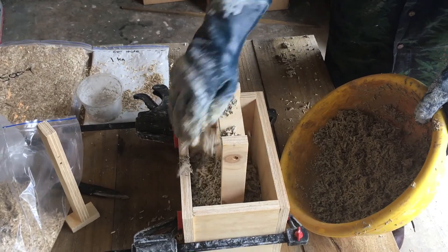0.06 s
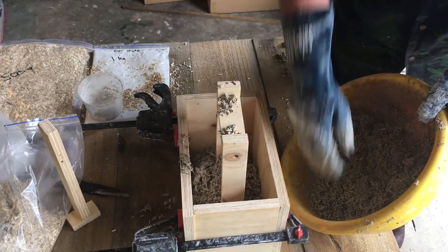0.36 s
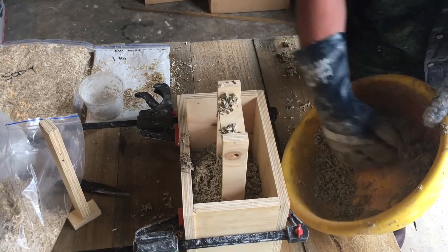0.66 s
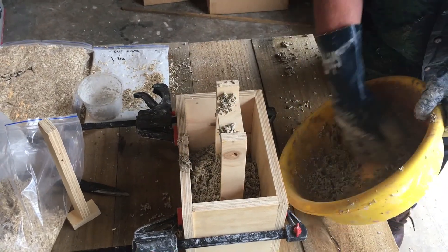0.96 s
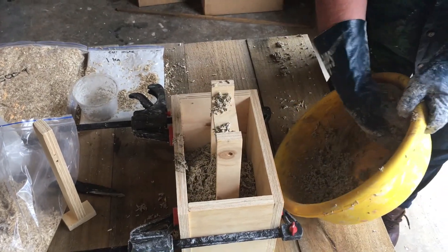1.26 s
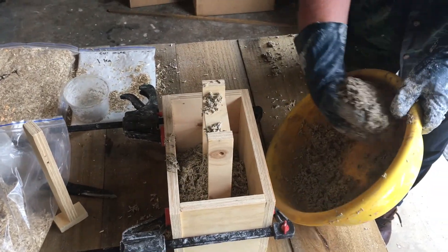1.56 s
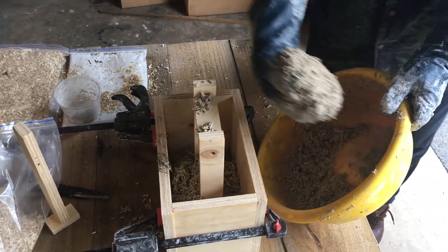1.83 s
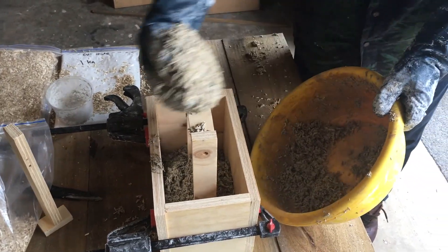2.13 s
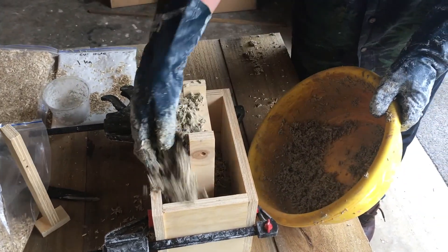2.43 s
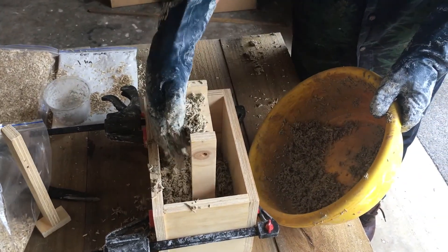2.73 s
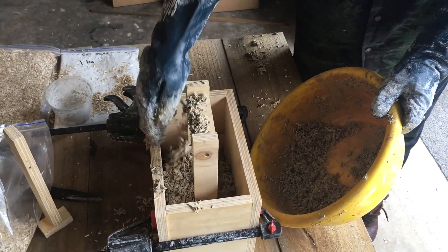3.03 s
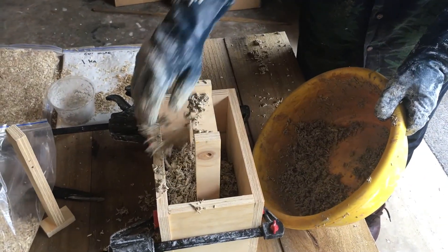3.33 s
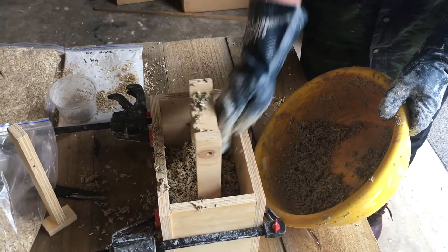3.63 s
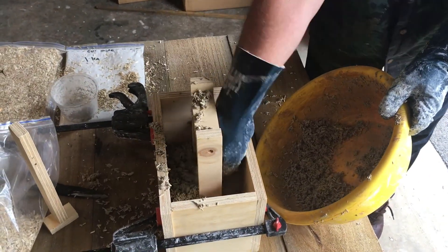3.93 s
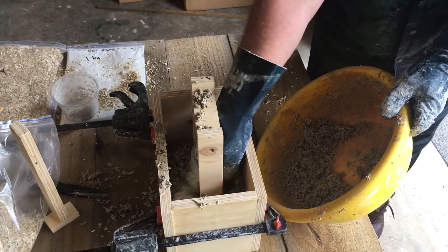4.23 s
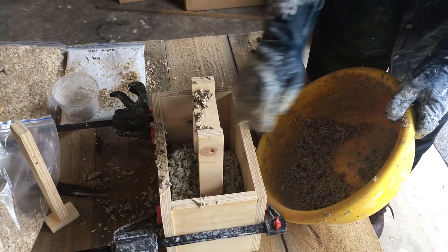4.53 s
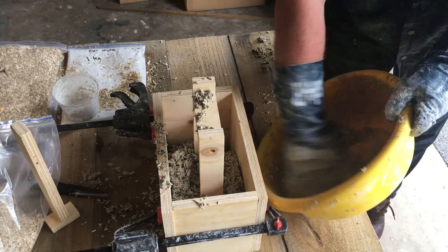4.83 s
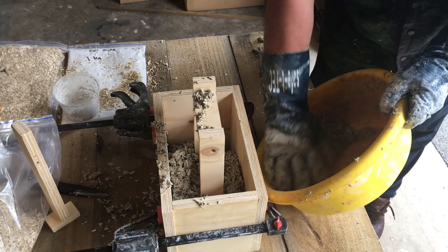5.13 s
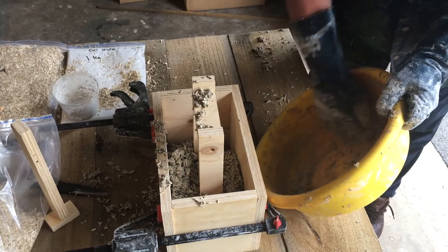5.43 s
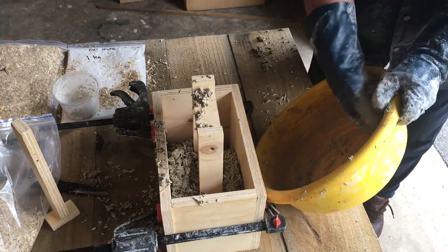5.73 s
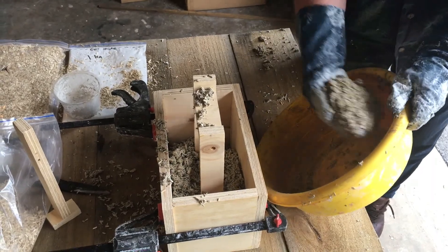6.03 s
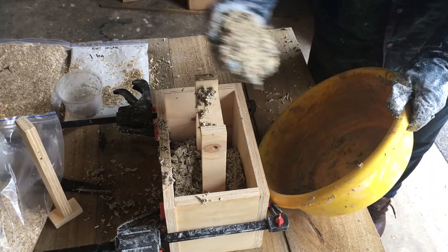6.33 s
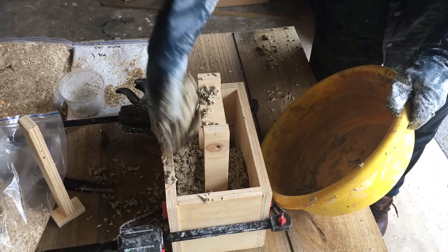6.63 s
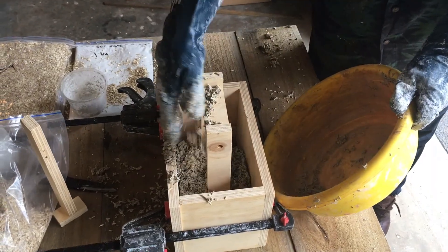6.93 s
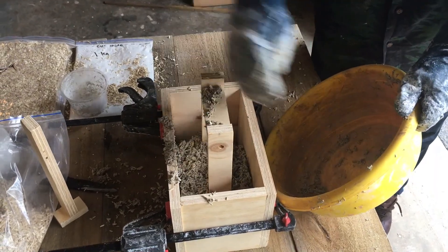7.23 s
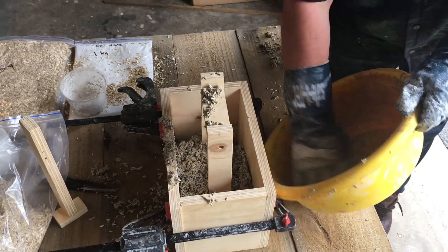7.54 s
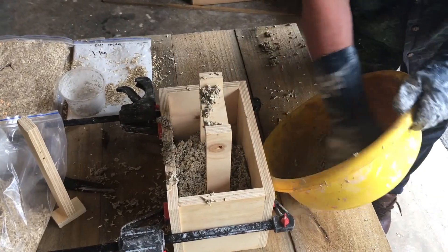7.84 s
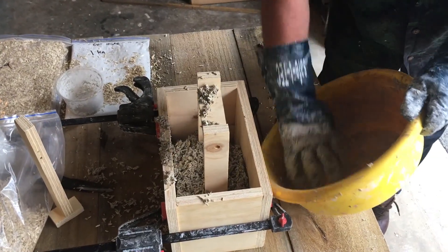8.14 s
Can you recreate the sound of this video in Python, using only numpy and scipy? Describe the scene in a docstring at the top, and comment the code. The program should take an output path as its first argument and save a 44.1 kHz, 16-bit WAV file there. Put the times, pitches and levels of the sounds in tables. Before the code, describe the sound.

Close to the microphone in a workshop, damp grit rasps against a plastic bowl in three bouts of scooping, with light slaps of a gloved hand on its wall. After the first, crumbs patter and the mix is packed into a wooden form with knocks and sticky rubber pops. After the second come quieter pressing and one tiny squeak. Distant traffic and a slowing engine rumble faintly underneath.

```python
"""Packing a damp mix by hand

Rubber-gloved hands scrape a damp, gritty mix together in a plastic bowl, drop it into a wooden form
and press it down. Friction is a train of tiny slips that excites the modes of bowl, glove and boards.
Crumbs tick on the bench; the wet glove pops and squeaks once. Outside the workshop traffic rumbles
and an engine slows down. One close microphone."""
import sys
import numpy as np
from scipy import signal
from scipy.fft import rfft, irfft, next_fast_len
from scipy.io import wavfile
from scipy.ndimage import uniform_filter1d, map_coordinates

SR = 44100
rng = np.random.default_rng(int(sys.argv[2]) if len(sys.argv) > 2 else 0)


def wav_out(sig):
    """Save sig, one row per channel (or a flat mono array), as 16-bit PCM at SR to the path in sys.argv[1]."""
    wavfile.write(sys.argv[1], SR, np.round(np.clip(np.atleast_2d(sig).T, -1, 1) * 32767).astype(np.int16))


N = 369558


def amp(db):
    """Decibels to amplitude ratio."""
    return 10 ** (np.asarray(db) / 20)


def unit(x):
    """Normalisation to rms 1."""
    return x / np.sqrt(np.mean(x ** 2) + 1e-20)


def along(points, hz):
    """Interpolation of (f/Hz, value) points on a logarithmic frequency axis."""
    f, values = np.transpose(points)
    return np.interp(np.log(hz + 1), np.log(f + 1), values)


def curves(rows):
    """Linear interpolation of (t/s, values...) rows: one curve per column, one value per sample."""
    times, *columns = np.transpose(rows)
    return [np.interp(np.arange(N) / SR, times, column) for column in columns]


def during(rows):
    """Rectangular window from the first row's time to the last."""
    t = np.arange(N) / SR
    return (t >= rows[0][0]) & (t <= rows[-1][0])


def wobble(rate):
    """Smooth random modulation: a spline through `rate` knots a second."""
    knots = rng.standard_normal(int(N * rate / SR) + 4)
    return map_coordinates(knots, [np.arange(N) * rate / SR])


def add(track, start, sound):
    """Superposition of a sound on the track from `start` seconds."""
    part = track[max(round(start * SR), 0):][:len(sound)]
    part += sound[:len(part)]


def filtered(x, response):
    """Linear filtering: the spectrum times a complex frequency response."""
    size = next_fast_len(len(x) + SR // 4)
    return irfft(rfft(x, size) * response(np.fft.rfftfreq(size, 1 / SR)), size)[:len(x)]


def coloured(x, spectrum):
    """Spectral shaping by (f/Hz, level/dB) points; rms 1."""
    return unit(filtered(x, lambda hz: amp(along(spectrum, hz))))


def resonate(x, modes):
    """Forced response of (f/Hz, bandwidth/Hz, level/dB) modes of alternating polarity."""
    return filtered(x, lambda f: sum(
        (-1) ** k * amp(db) * 1j * f * width / (hz * hz - f * f + 1j * f * width)
        for k, (hz, width, db) in enumerate(modes)))


def gliding(x, centre_hz, width_hz):
    """Time-varying resonance: shift down by the centre frequency, low-pass, shift back; rms 1."""
    carrier = np.exp(2j * np.pi * np.cumsum(centre_hz) / SR)
    pole = np.exp(-np.pi * width_hz / SR)
    baseband = signal.lfilter([1], np.poly([pole, pole]), x / carrier)
    return unit((baseband * carrier).real)


def ring(modes, attack_s=0.00072):
    """Free vibration: each mode decays at a rate proportional to its bandwidth; peak 1."""
    t = np.arange(SR // 4) / SR
    tone = sum(amp(db) * np.exp(-np.pi * width * t)
               * np.sin(2 * np.pi * hz * t + rng.uniform(0, 2 * np.pi)) for hz, width, db in modes)
    tone *= 1 - np.exp(-t / attack_s)
    return tone / np.abs(tone).max()


def impact(modes, contact_s):
    """Rough contact: a noise force, falling 60 dB in contact_s, drives the modes; peak 1."""
    t = np.arange(SR // 6) / SR
    force = rng.standard_normal(len(t)) * amp(-60 * t / contact_s)
    response = resonate(force, modes)
    return response / np.abs(response).max()


def grains(rate, spread_db):
    """Shot noise: on average `rate` slips a second, of log-normal size; rms 1."""
    impulses = (rng.random(N) < rate / SR) * rng.choice([-1, 1], N)
    return unit(impulses * amp(spread_db * rng.standard_normal(N)))


def patchy(x, depth_db):
    """Spectral fluctuation: clumps of different size colour the sound from moment to moment; rms 1."""
    spectra = signal.stft(x, nperseg=512)[2]
    patches = uniform_filter1d(rng.standard_normal(spectra.shape), size=5, axis=0)
    patches = uniform_filter1d(patches, size=7, axis=1)
    return unit(signal.istft(spectra * amp(depth_db * unit(patches)), nperseg=512)[1][:N])


def clock(step_s=0.001):
    """Coarse time axis for the hand's movements."""
    return np.arange(0, N / SR, step_s)


def effort(start, build, hold, release, contact_s=0.012, first_touch_db=-9):
    """Force envelope in dB: touch, lean in, hold, then fall 20 dB per release time."""
    t = clock() - start
    touch_db = 20 * np.log10(np.clip(t / contact_s, 1e-6, 1))
    lean_db = first_touch_db * np.clip(1 - t / build, 0, 1)
    after = np.maximum(t - build - hold, 0)
    settle_db = -11.5 - 75 * after  # loose grit slides on after the hand stops
    return touch_db + lean_db + np.maximum(-20 * after / release, settle_db)


def overlap(movements):
    """Incoherent addition of (level/dB, traits...) movements: powers sum and weight the traits."""
    level_db, *traits = np.swapaxes(movements, 0, 1)
    power = amp(level_db) ** 2 + 1e-14
    blended = [np.average(trait, axis=0, weights=power) for trait in traits]
    return curves(np.transpose([clock(), 10 * np.log10(power.sum(axis=0)), *blended]))


# Spectra of the street's rumble and tyre noise: f/Hz, level/dB
RUMBLE_SPECTRUM = [(20, -53), (31, -9), (44, 2.5), (60, 0), (97, 2), (125, -6.5), (150, -1), (180, -11),
                   (205, -5.5), (250, -18.5), (450, -56), (900, -84)]
TYRE_SPECTRUM = [(120, -10.5), (280, -0.5), (360, 0.5), (480, -7), (850, -5), (1330, -8), (2500, -19),
                 (6000, -28.5), (10500, -42.5), (15800, -39)]
# Swell of the traffic: t/s, relative rumble level/dB, relative tyre level/dB
TRAFFIC_LEVELS = [(0, -61.5, -65), (3.2, -62, -65.5), (4.7, -57.5, -65), (5.8, -55.5, -60.5),
                  (6.4, -55.5, -59), (7.3, -55, -62)]

def traffic():
    """Broadband noise of distant traffic: a low rumble under wavering tyre noise."""
    rumble_db, tyre_db = curves(TRAFFIC_LEVELS)
    rumble = amp(rumble_db + 0.26) * coloured(rng.standard_normal(N), RUMBLE_SPECTRUM)
    tyres = amp(tyre_db - 0.9 + 0.5 * wobble(4.4)) * coloured(rng.standard_normal(N), TYRE_SPECTRUM)
    return rumble + tyres


# An engine slowing: t/s, cycle rate/Hz, level/dB
ENGINE_RUN = [(0, 36.2, -59), (1.45, 29.7, -56.5), (2.7, 24.4, -58), (3.6, 21.8, -60), (4.3, 20.5, -72)]
# Low modes of the workshop: f/Hz, bandwidth/Hz, level/dB
ROOM_MODES = [(60, 22, -1), (97, 28, 0), (152, 36, -.5)]

def engine():
    """Harmonics of the falling cycle rate swell as each slides through a room mode."""
    cycle_hz, level_db = curves(ENGINE_RUN)
    phase = 2 * np.pi * np.cumsum(cycle_hz) / SR
    orders = sum(amp(2 * wobble(3)) * np.sin(k * phase + rng.uniform(0, 2 * np.pi)) for k in range(2, 7))
    return during(ENGINE_RUN) * amp(level_db) * unit(resonate(orders, ROOM_MODES))


# Reverberation time of the workshop: f/Hz, T60/s
ROOM_DECAY = [(200, 0.42), (2000, 0.17), (12000, 0.14)]

def room(x):
    """Reverberation: convolution with a short, exponentially decaying tail whose treble dies first."""
    hz, t, spectra = signal.stft(rng.standard_normal(SR // 2), SR, nperseg=256)
    decay = amp(-60 * t / along(ROOM_DECAY, hz)[:, None])
    tail = signal.istft(spectra * decay, SR, nperseg=256)[1]
    delayed = np.pad(x, (150, 0))
    return signal.fftconvolve(delayed, tail / np.linalg.norm(tail))[:N]


# Modes of the glove: f/Hz, bandwidth/Hz, level/dB
GLOVE_MODES = [(1420, 48, 0), (3290, 110, -1.5)]
# The glove coming unstuck: t/s, note level/dB, scuff level/dB
GLOVE_POPS = [(3.3192, -48, -48), (3.3342, -45, -39.5), (3.3755, -51, -50), (3.7378, -52, -40),
              (3.794, -45, -48), (4.548, -45, -38), (6.6944, -62, -44), (6.924, -46, -45)]

def glove_pops():
    """Sudden release of adhesion: wet rubber lets go with a hollow note and a short scuff."""
    track = np.zeros(N)
    hollow_mode, (upper_hz, width, _) = GLOVE_MODES
    for start, note_db, scuff_db in GLOVE_POPS:
        hz = upper_hz * (1 + 0.02 * rng.standard_normal())
        add(track, start, amp(note_db) * ring([hollow_mode]))
        add(track, start, amp(scuff_db) * impact([(hz, width, 0), (2300, 2600, -12)], contact_s=0.03))
    return track


# Rubber slipping: t/s, f/Hz, relative level/dB
SQUEAK_GLIDE = [(6.702, 3400, -74), (6.708, 3750, -55), (6.72, 4550, -58), (6.735, 3550, -58),
                (6.75, 3500, -56.5), (6.765, 3460, -59), (6.82, 3290, -59), (6.85, 2880, -64)]

def glove_squeak():
    """Stick-slip oscillation of rubber: one gliding tone, unsteady in pitch and level."""
    hz, level_db = curves(SQUEAK_GLIDE)
    phase = 2 * np.pi * np.cumsum(hz * (1 + 0.05 * wobble(900))) / SR
    return during(SQUEAK_GLIDE) * amp(level_db - 1.5 + 3.5 * wobble(200)) * np.sin(phase)


# Fine crumbs spilling off the glove: t/s, hold/s, level/dB
FINE_SPILLS = [(0.136, 0.38, -72.5), (1.58, 0.18, -73), (2.404, 0.26, -71), (6.7, 0.5, -71.5)]

def trickle(stray_db=-78):
    """Shot noise of fine crumbs: a faint, constant patter that swells with each spill."""
    spill_db, = overlap([[db + effort(start, build=0.083, hold=hold, release=0.11)]
                         for start, hold, db in FINE_SPILLS])
    fines = grains(rate=1200, spread_db=3) * amp(3 * wobble(45))
    patter = unit(resonate(fines, [(2560, 2500, 0)])) + amp(-4) * unit(resonate(fines, GLOVE_MODES))
    return np.hypot(amp(spill_db), amp(stray_db)) * unit(patter)


# One rub of the glove (first row), then crumbs ticking: t/s, relative level/dB, f/Hz, contact time/s
RUB_AND_TICKS = [(0.044, -35.5, 7640, .1), (0.179, -49, 2800, .04), (0.3, -46, 2700, 0.059),
                 (0.363, -46.5, 2010, 0.05), (0.4953, -46.5, 2580, .03), (1.6295, -48.5, 2283, 0.13),
                 (1.701, -48, 2420, 0.032), (1.772, -50.5, 2300, 0.11), (2.018, -52, 3500, 0.038),
                 (2.524, -41.5, 2760, 0.05), (2.609, -37, 4500, 0.018), (2.635, -41.5, 2500, .02),
                 (3.496, -43.5, 3400, 0.018), (4.523, -37.5, 2240, 0.022), (5.242, -41, 9000, 0.025),
                 (6.31, -45, 2200, 0.03), (7.141, -41, 1980, 0.034)]

def rub_and_ticks():
    """Heavily damped contacts (Q = 1): a brief, bright rub of the glove, then dead ticks of crumbs."""
    track = np.zeros(N)
    for start, db, hz, contact_s in RUB_AND_TICKS:
        add(track, start, amp(db) * impact([(hz, hz, 0)], contact_s))
    # the damp mix softens the treble
    return filtered(track, lambda hz: amp(along([(5500, 1), (11000, -12.5)], hz)))


# A handful breaking up in the form: t/s, build-up/s, hold/s, f/Hz, level/dB
BREAKUPS = [(2.46, 0.07, 0.1, 2800, -62.5), (2.8, 0.17, 0.11, 3230, -59.5)]

def crumbling():
    """Fracture noise: clusters of tiny cracks in one narrow, wandering band."""
    track = np.zeros(N)
    for start, build, hold, hz, db in BREAKUPS:
        level_db, = overlap([[db + effort(start, build, hold, release=0.1)]])
        cracks = grains(rate=700, spread_db=4) * amp(3 * wobble(50))
        track += amp(level_db) * gliding(cracks, hz * (1 + 0.025 * wobble(25)), width_hz=420)
    return track


# Modes of the wooden form: f/Hz, bandwidth/Hz, level/dB
FORM_MODES = [(140, 24, -2), (200, 16, 0), (300, 46, 0), (372, 50, -1), (872, 100, -6)]
# Fingers bumping the form: t/s, click level/dB, boom level/dB, f of the struck spot/Hz
FORM_KNOCKS = [(0.071, -42, -57, 600), (3.383, -45, -46, 347), (3.734, -53, -49, 200),
               (3.789, -38, -40.5, 195), (3.855, -33.5, -36, 293), (3.867, -55, -44, 140),
               (4.267, -36, -59, 800)]

def form_knocks(db_per_octave=20):
    """Modal excitation: a knock favours the modes nearest the pitch of the struck spot."""
    track = np.zeros(N)
    for start, click_db, boom_db, spot_hz in FORM_KNOCKS:
        modes = [(hz, width, db - db_per_octave * abs(np.log2(hz / spot_hz)))
                 for hz, width, db in FORM_MODES]
        add(track, start, amp(click_db) * impact([(880, 290, 0)], contact_s=0.011))
        add(track, start, amp(boom_db) * ring(modes))
    return track


# The hand striking the bowl: t/s, slap level/dB, thump level/dB
BOWL_SLAPS = [(0.532, -35.5, -65), (4.83, -36, -58), (4.855, -56, -47.5), (5.195, -41, -66),
              (7.928, -32.5, -50), (8.344, -56.5, -40), (8.363, -37, -41)]
# A falling lump tapping the bowl: t/s, level/dB, f/Hz
LUMP_TAP = (6.213, -46.5, 1320)

def bowl_strikes():
    """Impulse response of the bowl: the hand gives a slap and a low thump, a lump rings one mode."""
    track = np.zeros(N)
    for start, slap_db, thump_db in BOWL_SLAPS:
        add(track, start, amp(slap_db) * impact([(1156, 100, 10), (6000, 8300, -12.5)], contact_s=0.012))
        add(track, start, amp(thump_db) * ring([(145, 26, 0)]))
    start, db, hz = LUMP_TAP
    add(track, start, amp(db) * ring([(hz, 55, 0)]))
    return track


# Spectrum of rubber on the mix: f/Hz, level/dB
RUB_SPECTRUM = [(250, -5), (500, -4), (850, -4.5), (1300, -5.5), (2180, -1.5), (2700, -11), (3250, -4),
                (5500, -10), (8860, -18), (10400, -22.5), (15800, -29)]
# Pressing into the form: t/s, build-up/s, hold/s, relative rub level/dB, relative push level/dB
HAND_PRESSES = [(-0.01, 0.042, 0.011, -53.5, -75), (2.388, 0.033, 0.23, -61, -70),
                (2.716, 0.11, .02, -63, -85), (2.909, 0.04, .12, -57, -61),
                (3.288, 0.05, 0.017, -55.5, -66), (3.576, 0.004, 0.022, -53, -78),
                (3.713, 0.02, 0.062, -48.5, -56.5), (3.841, 0.035, 0.042, -50.5, -51),
                (4.014, 0.018, 0.02, -51.5, -56), (4.16, 0.065, 0.076, -56.5, -62),
                (4.376, 0.05, 0.05, -50, -50), (4.537, 0.006, 0.008, -45.5, -63),
                (6.678, 0.061, 0.12, -63.5, -73), (6.948, 0.048, 0.097, -67, -80)]

def packing():
    """Friction-driven vibration: the glove rubs the mix and drags on the boards, whose modes groan."""
    rub_db, = overlap([[db + effort(start, build, hold, release=0.1)]
                       for start, build, hold, db, _ in HAND_PRESSES])
    push_db, = overlap([[db + effort(start, build, hold, release=0.12)]
                        for start, build, hold, _, db in HAND_PRESSES])
    slips = grains(rate=4000, spread_db=1.5) * amp(1.73 * wobble(110))
    glove_tone = amp(-8) * unit(resonate(slips, GLOVE_MODES))
    rub = patchy(coloured(slips, RUB_SPECTRUM) + glove_tone, depth_db=2.5)
    drag = resonate(grains(rate=900, spread_db=2), [(335, 150, 0), (872, 200, -6)])
    boards = unit(resonate(drag, FORM_MODES))
    return amp(rub_db + 1.37) * rub + amp(push_db - 1.5) * boards


# Main resonance of the bowl's wall: t/s, f/Hz
WALL_PITCH = [(0.7, 1170), (1.05, 1290), (1.17, 1130), (5.0, 1170), (7.6, 1100)]
# Modes of the wall: ratio to that resonance, bandwidth/Hz, level/dB
WALL_MODES = [(1, 190, -15), (1.85, 450, -16.5)]

def bowl_wall(slips, wander=0.05, swell_db=3):
    """Forced vibration of the plastic wall under the grit; its modes shift as hand and load move."""
    wall_hz, = curves(WALL_PITCH)
    return sum(amp(db + swell_db * wobble(14))
               * gliding(slips, ratio * wall_hz * (1 + wander * wobble(12)), width)
               for ratio, width, db in WALL_MODES)


def stroke(start, build, hold, release, db, heap_db, bright_db):
    """Level, heap and brightness envelopes in dB: the heap thins with travel, and force adds treble."""
    effort_db = effort(start, build, hold, release)
    thinning_db = 25.5 * np.clip(clock() - start, 0, build + hold)
    lift_db = 0.72 * np.maximum(effort_db, -30)
    return db + effort_db, heap_db - thinning_db, bright_db + lift_db


# Spectrum of grit on plastic: f/Hz, level/dB
GRIT_SPECTRUM = [(100, -14), (190, -4.5), (270, -15.5), (390, -6), (560, -13), (850, -5), (1150, -1),
                 (2400, -0.5), (2850, -4), (3300, 1.3), (4600, 1), (5900, -1), (9500, -8.5), (10400, -11),
                 (15800, -15.5)]
# Strokes through the bowl: t/s, build-up/s, hold/s, release/s, relative level/dB, heap/dB, brightness/dB
HAND_STROKES = [(0.525, 0.036, 0.061, .07, -42, 1.5, 1), (0.609, 0.064, 0.046, 0.1, -37.5, 6.5, -3.5),
                (0.818, 0.012, 0.009, 0.056, -47.5, 13, 7), (0.876, 0.028, 0.032, 0.087, -48.5, 6, 1.5),
                (0.931, 0.093, 0.083, 0.26, -35.5, 3.5, -2.5), (1.212, 0.028, 0.088, 0.24, -45.5, -2, -8.5),
                (1.346, 0.022, 0.06, 0.18, -45, -1.5, -2.5), (4.823, 0.071, 0.024, 0.049, -44, 8, 2.5),
                (4.924, 0.037, 0.089, 0.089, -35.5, 2, 2.5), (5.254, 0.042, 0.023, 0.096, -45.5, 11.5, 6.5),
                (5.292, 0.046, 0.28, 0.25, -35, 3, 2), (5.734, 0.066, 0.038, 0.097, -40.5, -6, -3.5),
                (5.878, 0.033, 0.091, 0.065, -50.5, -6, -1.5), (7.489, 0.013, 0.058, .06, -47.5, 10.5, 4.5),
                (7.566, 0.034, 0.15, 0.076, -36, 2, 4), (7.809, 0.023, 0.018, 0.043, -46.5, 0, 5.5),
                (7.916, 0.17, 0.039, 0.061, -32, 5, 8), (8.322, 0.11, 0.024, 0.09, -40, 6.5, 1)]

def scooping():
    """Granular friction of grit on plastic: a fast stroke is brighter, a full hand heavier."""
    level_db, heap_db, bright_db = overlap([stroke(*row) for row in HAND_STROKES])
    slips = grains(rate=11000, spread_db=2.5) * amp(0.43 * wobble(90))
    grit = patchy(coloured(slips, GRIT_SPECTRUM), depth_db=2.3)
    # from low to high: the shoved heap, the rasp of coarse grit, its sharp edge, the fizz of fine sand
    heap = filtered(grit, lambda hz: along([(650, 1), (1000, 0)], hz))
    rasp = filtered(grit, lambda hz: along([(2300, 1), (4000, 0.042)], hz)) - heap
    fizz = filtered(grit, lambda hz: along([(4500, 0.049), (8000, 0.87)], hz))
    edge = grit - heap - rasp - fizz
    wall = bowl_wall(grains(rate=2500, spread_db=1.5))
    body = rasp + wall + heap * amp(heap_db + 1.5)
    treble = edge * amp(0.41 * bright_db) + fizz * amp(bright_db)
    return amp(level_db - 0.77 - 0.23 * bright_db) * (body + treble)


def scene():
    """Superposition of the bench work, its reverberation and the street, alike in both channels."""
    work = scooping() + packing() + crumbling() + rub_and_ticks() + trickle()
    work += glove_pops() + glove_squeak() + form_knocks() + bowl_strikes()
    mono = work + amp(-13) * room(work) + traffic() + engine()
    return np.array([mono, mono])


def record(dry):
    """Band limiting: a steep low-pass removes the highest treble."""
    cutoff_hz, transition_hz = 15900, 300
    low_pass = lambda hz: np.clip(0.5 + (cutoff_hz - hz) / transition_hz, 0, 1)
    return np.array([filtered(channel, low_pass) for channel in dry])


dry = scene()
out = record(dry)
wav_out(out)
```